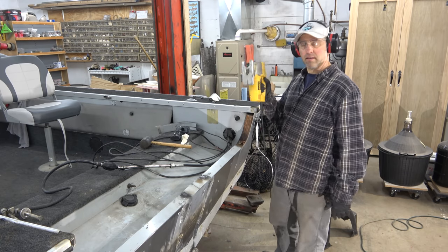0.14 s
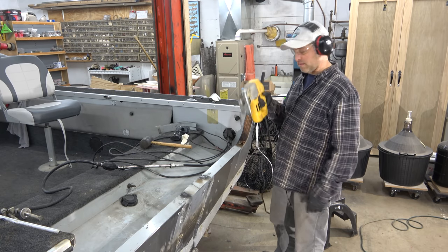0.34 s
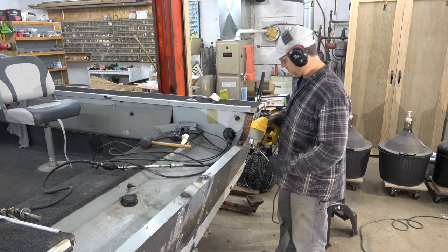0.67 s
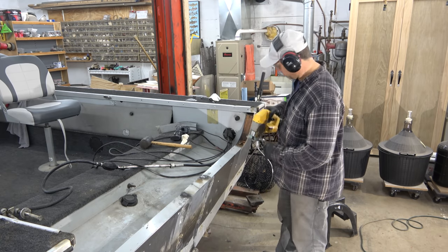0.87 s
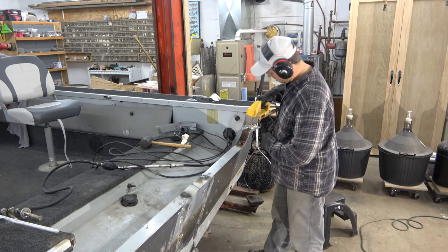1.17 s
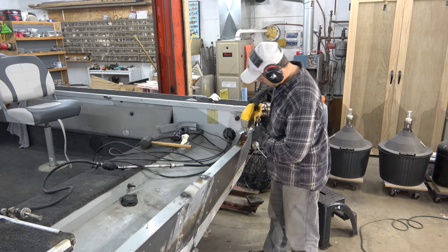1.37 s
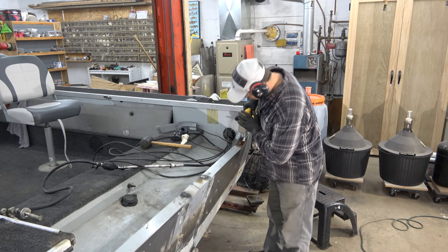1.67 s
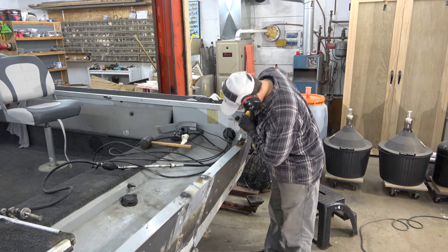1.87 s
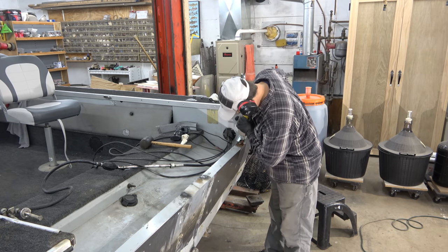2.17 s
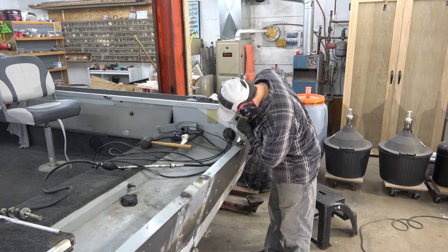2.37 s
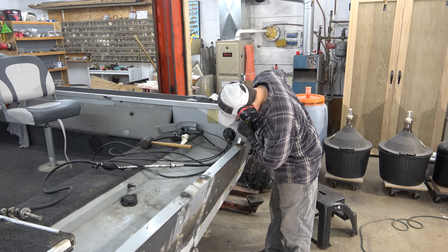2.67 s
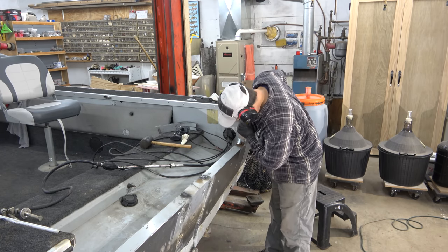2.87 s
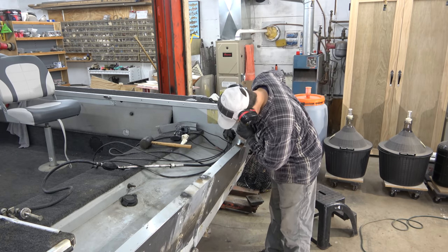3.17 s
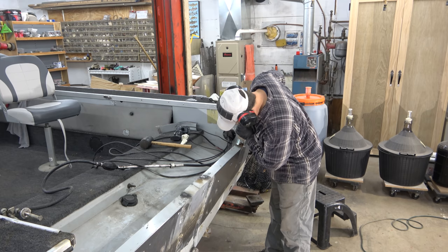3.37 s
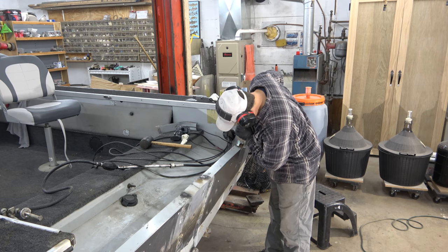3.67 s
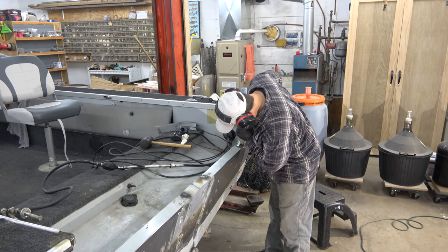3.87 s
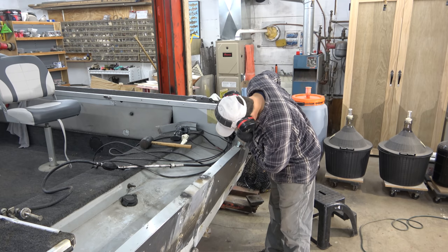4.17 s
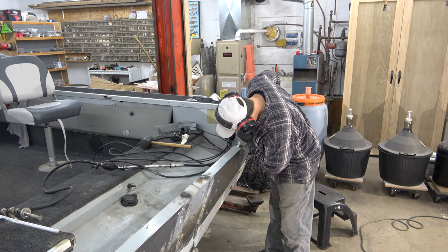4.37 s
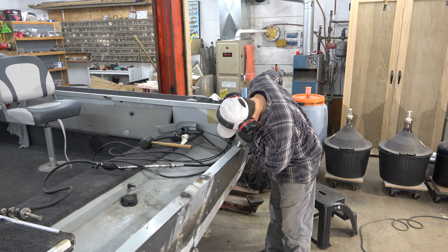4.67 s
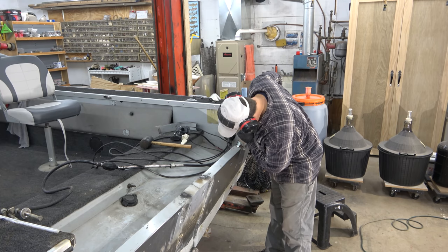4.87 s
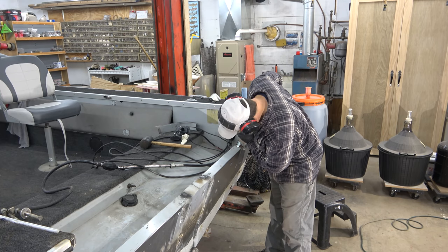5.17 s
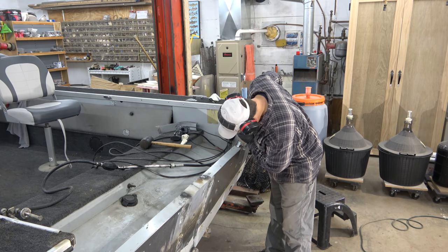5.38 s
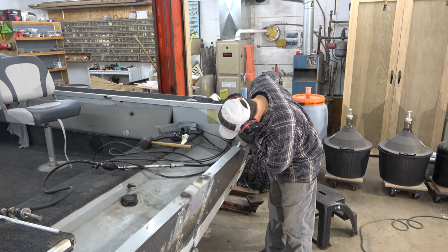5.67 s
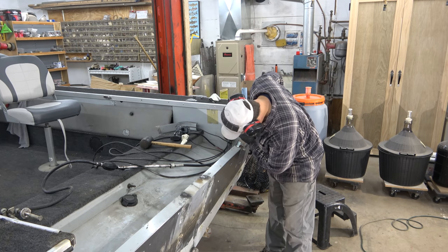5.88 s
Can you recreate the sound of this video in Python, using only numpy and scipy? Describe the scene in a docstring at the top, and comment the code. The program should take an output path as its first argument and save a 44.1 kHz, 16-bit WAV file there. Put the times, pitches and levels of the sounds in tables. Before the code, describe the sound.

In a hard-walled workshop, a power saw coasts to a stop, is handled and bumped against a boat rim, then buzzes harshly into sheet aluminum.

```python
"""A jigsaw coasts to rest in a hard-walled workshop, jerks once, then spins up and rasps through an aluminum boat hull.
Its rattle and rasp are filtered noise chopped by the strokes; hum, gears and whistle are tones tied to the crank.
In between, sleeves and shoes scuff as it is carried, and it clicks and knocks against the rim: short noise bursts
and fading tones. Noisy room tails surround all of these, over a low rumble and a faint hiss."""
import sys
import numpy as np
from scipy import signal
from scipy.fft import rfft, irfft, next_fast_len
from scipy.io import wavfile
from scipy.ndimage import map_coordinates

SR = 44100
rng = np.random.default_rng(int(sys.argv[2]) if len(sys.argv) > 2 else 0)


def materialize(psi):
    """Save the field psi as 16-bit PCM at rate SR to the path in sys.argv[1].

    A 1-D psi becomes a single channel; in a 2-D psi each row is a channel.
    """
    bounded = np.clip(np.atleast_2d(psi).T, -1, 1)
    quanta = np.round(bounded * 32767).astype(np.int16)
    wavfile.write(sys.argv[1], SR, quanta)


N = 265923  # length in samples
T = np.arange(N) / SR  # time in seconds


def amp(db):
    """Turn decibels into a gain."""
    return 10 ** (np.asarray(db) / 20)


def unit(x):
    """Scale a sound to an rms of 1."""
    return x / np.sqrt(np.mean(x ** 2) + 1e-20)


def along(points, hz):
    """Read a curve of (Hz, value) points on a logarithmic frequency axis."""
    f, v = np.transpose(points)
    return np.interp(np.log(hz + 1), np.log(f + 1), v)


def wobble(rate):
    """A smooth random curve, with rate random points a second."""
    points = rng.standard_normal(int(N * rate / SR) + 4)
    return map_coordinates(points, [T * rate], order=2)


def filtered(x, response):
    """Multiply the spectrum of x by a response of frequency."""
    n = x.shape[-1]
    padded = next_fast_len(n + 8192)
    spectrum = rfft(x, padded) * response(np.fft.rfftfreq(padded, 1 / SR))
    return irfft(spectrum, padded)[..., :n]


def noise(colour, shape=lambda hz: 1, size=N):
    """Random noise with a given colour and an rms of 1."""
    white = rng.standard_normal(size)
    return unit(filtered(white, lambda hz: amp(along(colour, hz)) * shape(hz)))


def above(hz, edge_hz):
    """Gain of a steep filter that passes what lies above the edge."""
    return np.sqrt(1 - below(hz, edge_hz) ** 2)


def below(hz, edge_hz):
    """Gain of a steep filter that passes what lies below the edge."""
    return 1 / np.sqrt(1 + (hz / edge_hz) ** 8)


def add(track, s, sound):
    """Mix a sound into the track at s seconds."""
    part = track[max(round(s * SR), 0):][:len(sound)]
    part += sound[:len(part)]


# How long the room rings. Each row: frequency in Hz, time to fade by 60 dB in seconds.
ROOM_FADE = [(60, 0.37), (300, 0.57), (1000, 0.58), (3000, 0.49), (7000, 0.41), (14000, 0.3)]


def room(x, direct_db, build=0.002, drift=0.801):
    """Mid and side signals: direct sound plus a diffuse noisy tail that changes as the worker moves."""
    hz, t, grid = signal.stft(rng.standard_normal((2, 2, SR * 2 // 3)), SR, nperseg=256)
    fade = amp(-60 * t / along(ROOM_FADE, hz)[:, None])
    tails = signal.istft(grid * fade * (1 - np.exp(-t / build)), SR, nperseg=256)[1]
    tails = tails / np.linalg.norm(tails[0, 0])
    one, other = signal.fftconvolve(x[None, None], tails, axes=2)[..., :N]
    # turn steadily between two sets of tails, drift turns a second
    angle = 2 * np.pi * drift * T
    mid, side = np.cos(angle) * one + np.sin(angle) * other
    direct = amp(direct_db)
    return np.array([(mid + direct * x) / np.hypot(1, direct), side])


# Colour of the background. Each row: frequency in Hz, noise level per Hz in dB.
FLOOR_COLOUR = [(20, -0.5), (45, -1.5), (85, -1), (150, -15.5), (260, -22), (600, -21), (1400, -22.5),
                (1900, -30.5), (16000, -38.5)]
FLOOR_DB = -56.5


def floor():
    """The workshop's low rumble and faint hiss: separate noise in mid and side."""
    return amp(FLOOR_DB) * np.array([noise(FLOOR_COLOUR), noise(FLOOR_COLOUR)])


# Colours of brushing cloth and a dragging sole. Each row: frequency in Hz, noise level per Hz in dB.
CLOTH_COLOUR = [(150, -42), (250, -14.5), (367, -4.5), (761, -3), (831, -4), (3840, -5), (11100, -19.5),
                (16000, -34)]
SOLE_COLOUR = [(120, -21), (260, -0.5), (500, 2.5), (750, -2), (1100, -27), (2500, -53)]
# Scuffs of sleeves and shoes.
# Each row: loudest moment in seconds, cloth level in dB, sole level in dB, half length in seconds.
SCUFFS = [(0.975, -56, -72, 0.055), (1.092, -55, -57, 0.035), (1.284, -44.5, -54.5, 0.034),
          (1.635, -48.5, -60, 0.05), (1.679, -47, -41, 0.015), (1.722, -34.5, -35.5, 0.018),
          (1.893, -47, -57, 0.035), (1.963, -50, -63, 0.069), (2.22, -67, -64, 0.054),
          (2.607, -50.5, -72, 0.045), (3.045, -62, -68, 0.013), (3.179, -54.5, -57, .012),
          (4.035, -56, -54.5, 0.047)]


def scuffs(grain_db=2.0):
    """Cloth brushes in short grainy swells; a sole drags on the concrete."""
    cloth, sole = np.zeros((2, N))
    for s, cloth_db, sole_db, half in SCUFFS:
        swell = np.exp(-((T - s) / half) ** 2 / 2)
        cloth += amp(cloth_db) * swell
        sole += amp(sole_db) * swell
    grains = unit(amp(grain_db * wobble(300)))
    return grains * (cloth * noise(CLOTH_COLOUR) + sole * noise(SOLE_COLOUR))


# Colours of a hard tick and of the plastic housing. Each row: frequency in Hz, noise level per Hz in dB.
CLICK_COLOUR = [(150, -42), (500, -23), (3000, -7), (9000, -10), (16000, -14.5)]
HOUSING_COLOUR = [(90, -33), (210, 0.5), (450, -17.5), (1200, -20.5), (2500, -43)]
# Tones of the saw's steel shoe.
# Each row: frequency in Hz, level in dB before a small random change, time to fade by 60 dB in seconds.
STEEL_TONES = [(2900, 5.5, 0.5), (5360, -11, .3), (7000, -11, .3), (8760, -7, .38), (13000, -12, .28)]
# Clicks of small hard parts of the saw.
# Each row: start in seconds, tick level in dB, ring level in dB, housing level in dB.
CLICKS = [(0.0696, -13, -38, -53), (0.1702, -15.5, -40, -60.5), (0.298, -24, -59, -66),
          (1.2373, -33, -58, -65), (1.5723, -44, -72, -52), (1.863, -27.5, -62.5, -51),
          (2.4967, -47.5, -79, -63), (3.168, -46.5, -84, -42), (3.3641, -29, -67, -41),
          (3.378, -30.5, -63, -45.5)]


def clicks(tick_t60=0.016, housing_t60=0.068):
    """A short tick sets the steel shoe ringing and bumps the plastic housing."""
    out, t = np.zeros(N), np.arange(SR // 2) / SR
    for s, tick_db, ring_db, housing_db in CLICKS:
        ring = np.zeros(len(t))
        for hz, level_db, t60 in STEEL_TONES:
            fade = amp(level_db + rng.normal(0, 1.5) - 60 * t / t60)
            ring += fade * np.sin(2 * np.pi * hz * t)
        tick = amp(tick_db - 60 * t / tick_t60) * noise(CLICK_COLOUR, size=len(t))
        housing = amp(housing_db - 60 * t / housing_t60) * noise(HOUSING_COLOUR, size=len(t))
        add(out, s, tick + amp(ring_db) * ring + housing)
    return out


# Colour of a blow on the rim. Each row: frequency in Hz, noise level per Hz in dB.
KNOCK_COLOUR = [(150, -34), (250, -7), (367, 2), (566, -4), (686, -5), (1330, -6), (1450, -6.5), (2320, -6),
                (8850, -29), (13200, -46), (16000, -59.5)]
# The saw hitting the rim; the thuds below use these blows too.
# Each row: start in seconds, crack level in dB, thud level in dB, bright edge level in dB.
KNOCKS = [(3.787, -67, -48, -68), (4.051, -21.5, -27, -41), (4.423, -17, -39.5, -23),
          (4.431, -16.5, -31.5, -20), (4.614, -18, -22, -15.5), (4.627, -15.5, -21.5, -33),
          (4.666, -20, -25.5, -32), (4.882, -34, -47, -51), (4.962, -21, -35.5, -39)]


def knocks(crack_t60=0.05, edge_t60=0.025):
    """Each blow cracks on the rim, with a bright edge where steel meets aluminum."""
    out, t = np.zeros(N), np.arange(SR // 2) / SR
    for s, crack_db, _, edge_db in KNOCKS:
        crack = amp(crack_db - 60 * t / crack_t60) * noise(KNOCK_COLOUR, size=len(t))
        bright = noise(CLICK_COLOUR, lambda hz: above(hz, 2500) * below(hz, 9500), size=len(t))
        edge = amp(edge_db - 60 * t / edge_t60) * bright
        add(out, s, crack + edge)
    return out


# Bending tones of the hull's side, with pitch and level varied a little at random for each blow.
# Each row: middle frequency in Hz, middle level in dB, time to fade by 60 dB in seconds.
PANEL_TONES = [(53, -6, 0.23), (72, -3.5, 0.28), (105, -5.5, 0.22), (136, 0, 0.19), (206.4, 0, 0.16),
               (271, 1, 0.12)]


def thuds(rise=0.0082):
    """The wide side panel takes a moment to bend under each blow, then booms briefly."""
    out, t = np.zeros(N), np.arange(SR // 2) / SR
    for s, _, thud_db, _ in KNOCKS:
        boom = np.zeros(len(t))
        for hz, db, t60 in PANEL_TONES:
            fade = amp(db + rng.normal(0, 1.9) - 60 * t / t60)
            cycles = hz * (1 + 0.051 * rng.normal()) * t
            boom += fade * np.sin(2 * np.pi * (cycles + rng.random()))
        add(out, s, amp(thud_db) * (1 - np.exp(-t / rise)) * boom)
    return out


FRICTION_HZ_PER_S = 18.5  # stroke rate lost each second with the power off


def coasting(s, start_speed):
    """Stroke rate with the power off: friction slows the crank evenly to rest."""
    return (T >= s) * np.maximum(start_speed - FRICTION_HZ_PER_S * (T - s), 0)


SLACK_SPEED = 5.8  # strokes a second at which the rattle gain is one half


def rattling(speed):
    """Gain of the loose linkage, which falls silent as the crank comes to rest."""
    return speed ** 2 / (speed ** 2 + SLACK_SPEED ** 2)


TRIGGER_S, SPIN_UP_S = 5.05, 0.196  # trigger held from here; time to gain 63% of full speed


def powered():
    """Share of full speed: the motor closes in on it exponentially once the trigger is held."""
    return 1 - np.exp(-np.maximum(T - TRIGGER_S, 0) / SPIN_UP_S)


def torque():
    """Share of full torque: greatest at the start, fading as the motor nears full speed."""
    return (T > TRIGGER_S) * (1 - powered())


# The saw running down, first after a free run and then after a touch of the trigger.
# Each row: start in seconds, starting speed in strokes a second, rattle level in dB, rasp level in dB.
COASTS = [(0.0, 12.7, -23, -30), (4.425, 8.3, -25, -35)]
FULL_SPEED_HZ = 45.23  # strokes a second


def crank():
    """Strokes completed since the start: the running total of the stroke rate."""
    speed = FULL_SPEED_HZ * powered() + sum(coasting(s, start_speed) for s, start_speed, _, _ in COASTS)
    return np.cumsum(speed) / SR


def line(turns, multiple, blur, flutter_db):
    """One harmonic of the crank, unsteady in phase and strength."""
    phase = 2 * np.pi * (multiple * turns + rng.random()) + blur * wobble(60)
    return unit(np.sin(phase) * amp(flutter_db * wobble(22)))


# Tones of the armature under torque, heard where they cross housing resonances.
# Each row: multiple of the stroke rate (rounded to a whole number), level in dB,
# resonance frequency in Hz, its spread to either side in Hz.
PULL_LINES = [(71.9, -21.5, 2370, 580), (117.3, -20.5, 2030, 260), (116.3, -22, 3750, 750),
              (349, -28, 12100, 1000)]


def armature_song():
    """The armature sings while it pulls up to speed, strongest as each tone passes a resonance."""
    turns, speed_hz = crank(), FULL_SPEED_HZ * powered()
    song = np.zeros(N)
    for multiple, db, centre_hz, spread_hz in PULL_LINES:
        radiated = np.exp(-((round(multiple) * speed_hz - centre_hz) / spread_hz) ** 2 / 2)
        tone = line(turns, round(multiple), blur=1.4, flutter_db=4)
        song += amp(db) * np.sqrt(torque()) * radiated * tone
    return song


MESH_DB = -32.5  # level before the speed gain and the filter


def coasting_mesh():
    """The meshing gears sink in pitch and fade as the saw coasts."""
    freewheel = sum(rattling(coasting(s, speed)) for s, speed, _, _ in COASTS)
    mesh = amp(MESH_DB) * freewheel * line(crank(), 72, blur=0.9, flutter_db=4)
    return filtered(mesh, lambda hz: above(hz, 430) ** 4 * below(hz, 800) ** 3)


# Harmonics of the strokes and of the gears. Each row: multiple of the stroke rate, level in dB.
STROKE_LINES = [(2, -19), (3, 1.5), (4, -18), (5, -2), (7, 2.5), (8, -2), (10, -1.5)]
GEAR_LINES = [(18, -18.5), (54, -18), (72, -17), (117, -16.5), (144, -13)]
HUM_DB, GEAR_DB, WHISTLE_DB = -44, -19.5, -31.5  # at full speed
GEAR_GROWTH, WHISTLE_GROWTH = 3.8, 12  # powers of the speed: these sing out only near the top
BOOM_HZ, BOOM_WIDTH_HZ, BOOM_DB = 375, 45, -27.5  # a panel resonance swept by the ninth stroke harmonic


def whine():
    """Stroke harmonics, gear mesh and motor whistle follow the crank; one harmonic makes a panel boom."""
    turns, speed = crank(), powered()
    hum = sum(amp(db) * line(turns, round(k), blur=0.084, flutter_db=1.5) for k, db in STROKE_LINES)
    gears = sum(amp(db) * line(turns, round(k), blur=0.66, flutter_db=1.5) for k, db in GEAR_LINES)
    detune = (9 * FULL_SPEED_HZ * speed - BOOM_HZ) / (BOOM_WIDTH_HZ / 2)
    boom = line(turns, 9, blur=0.05, flutter_db=0.5) / (1 + detune ** 2)
    whistle = line(turns, 234, blur=0.45, flutter_db=2.5)
    low = amp(HUM_DB) * speed * hum + amp(BOOM_DB) * boom
    high = amp(GEAR_DB) * speed ** GEAR_GROWTH * gears
    high = high + amp(WHISTLE_DB) * speed ** WHISTLE_GROWTH * whistle
    return room(low, direct_db=20) + room(high, direct_db=2.0)


def chatter(turns, depth_db, teeth_db, grit_db):
    """The blade slaps at both ends of each stroke, and its teeth catch unevenly in between."""
    slap = np.exp(-4 * (2 * turns % 1)) * (1 + 0.1 * np.cos(2 * np.pi * turns))
    return unit(amp(depth_db * slap + teeth_db * wobble(900) + grit_db * wobble(40)))


def sheet(hz, modes, ring_db=4):
    """Narrow resonances of the metal stand out of its dense modes."""
    peaks = sum(amp(db / 2) / (1 + ((hz - f) / (width_hz / 2)) ** 2) for f, width_hz, db in modes)
    return 1 + amp(ring_db) * peaks / 2


def rattle(body, rasp, colour, modes):
    """The metal rings in the middle range while the teeth hiss above it; body and rasp are their gains."""
    low = noise(colour, lambda hz: sheet(hz, modes) * below(hz, 2990))
    high = noise(colour, lambda hz: sheet(hz, modes) * above(hz, 3680))
    return body * low + rasp * high


def bite(level_db, surge_db, attack_s, lead_s=0.036):
    """Gain in the cut: it rises as the blade bites, is shifted by the torque surge, then holds."""
    age = np.maximum(T - TRIGGER_S + lead_s, 0)
    return (1 - np.exp(-(age / attack_s) ** 2)) * amp(level_db + surge_db * (1 - powered()))


# Colours of coasting, cutting and the shaking hull. Each row: frequency in Hz, noise level per Hz in dB.
COAST_COLOUR = [(150, -37), (270, -26), (450, -3), (900, -0.5), (1800, -2), (4000, -2.5), (8000, -8.5),
                (12000, -18.5), (16000, -36.5)]
CUT_COLOUR = [(150, -20), (250, -8), (360, -1), (566, -7.5), (788, -3.5), (1450, -5), (3340, -2.5),
              (4990, -7.5), (6360, -5.5), (10700, -14.5), (16000, -22.5)]
SHAKE_COLOUR = [(40, -45), (70, -6), (130, -16.5), (170, 0), (330, -6), (450, -26), (800, -53)]
# Resonances of the gear case and of the hull's sheet.
# Each row: frequency in Hz, width in Hz, strength in dB (halved when the peak is built).
CASE_MODES = [(1760, 82, 4), (1880, 80, 2), (2156, 69, 5), (2197, 54, 6)]
HULL_MODES = [(792, 32, -5), (880, 15, -15), (1330, 14, 0.5), (1724, 51, 3), (2370, 32, -9), (3130, 22, -8),
              (3650, 33, -3), (5250, 23, -19)]
# In the cut: level in dB, change at full torque in dB, rise time in seconds.
RATTLE_DB, RATTLE_SURGE_DB, RATTLE_ATTACK_S = -24, 3.5, 0.066
RASP_DB, RASP_SURGE_DB, RASP_ATTACK_S = -25, -0.5, 0.1
SHUDDER_DB = -44  # at full speed


def saw():
    """The saw's rattle and rasp, coasting and cutting, and the hull shuddering under the strokes."""
    turns = crank()
    idle = chatter(turns, depth_db=2.5, teeth_db=2.5, grit_db=1)
    loaded = chatter(turns, depth_db=8, teeth_db=1.5, grit_db=0.4)
    coast = np.zeros(N)
    for s, speed, rattle_db, rasp_db in COASTS:
        metal = rattle(amp(rattle_db), amp(rasp_db), COAST_COLOUR, CASE_MODES)
        coast += rattling(coasting(s, speed)) * metal
    body = bite(RATTLE_DB, RATTLE_SURGE_DB, RATTLE_ATTACK_S)
    rasp = bite(RASP_DB, RASP_SURGE_DB, RASP_ATTACK_S)
    cut = rattle(body, rasp, CUT_COLOUR, HULL_MODES)
    shudder = amp(SHUDDER_DB) * np.sqrt(powered()) * noise(SHAKE_COLOUR)
    return idle * coast + loaded * (cut + shudder)


# Stereo width. Each row: frequency in Hz, gain of the side signal in dB.
WIDTH = [(60, -17), (600, -18.5), (2500, -24), (4200, -30), (6000, -8.5), (8500, -7.5), (15000, -10.5)]


def scene():
    """All sources in the room as left and right, nearly mono except in the treble."""
    tool = room(saw(), direct_db=1.5) + whine() + room(armature_song() + coasting_mesh(), direct_db=4)
    contacts = room(knocks(), direct_db=-2.5) + room(thuds(), direct_db=4.5) + room(clicks(), direct_db=-3)
    mid, side = tool + contacts + room(scuffs(), direct_db=3.5) + floor()
    side = filtered(side, lambda hz: amp(along(WIDTH, hz)))
    return np.array([mid + side, mid - side])


TOP_HZ = 15950


def record(dry):
    """Round off the highest peaks, then remove everything from TOP_HZ up."""
    held = dry / (1 + np.abs(dry / 0.42) ** 6) ** (1 / 6)
    return filtered(held, lambda hz: hz < TOP_HZ)


dry = scene()
out = record(dry)
materialize(out)
```